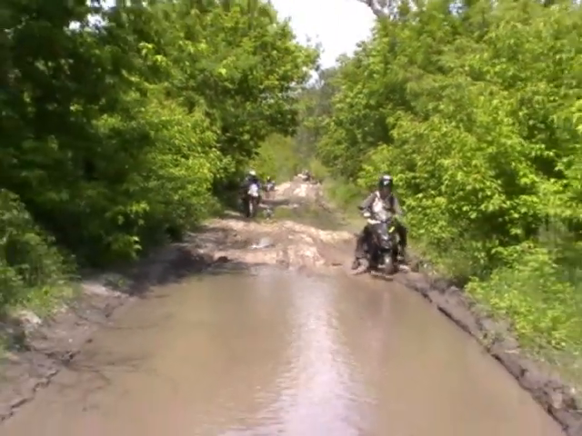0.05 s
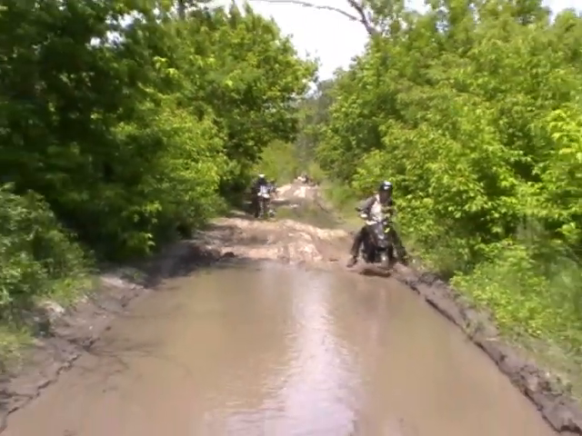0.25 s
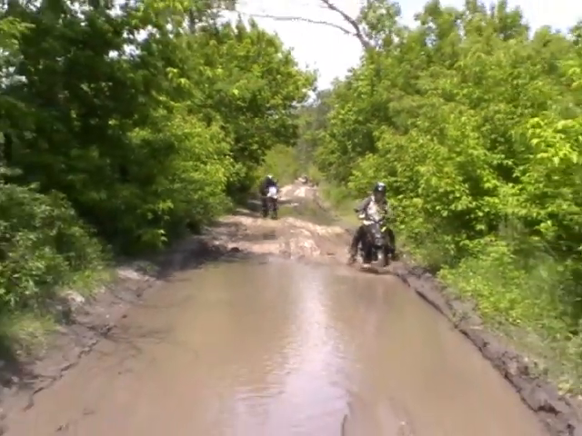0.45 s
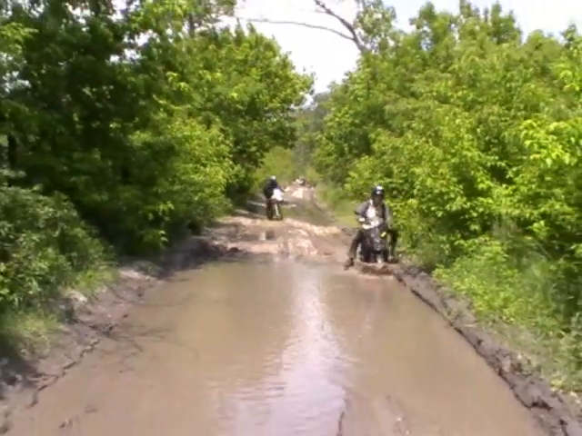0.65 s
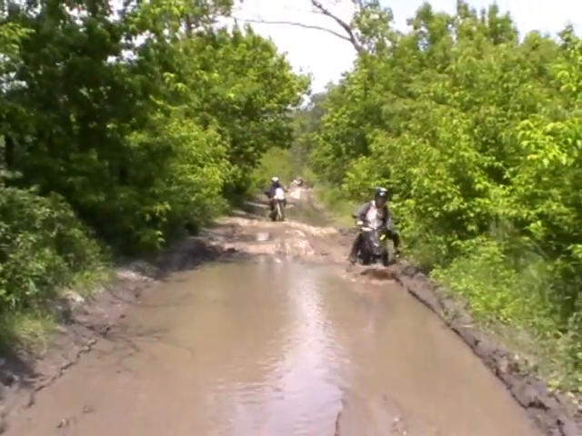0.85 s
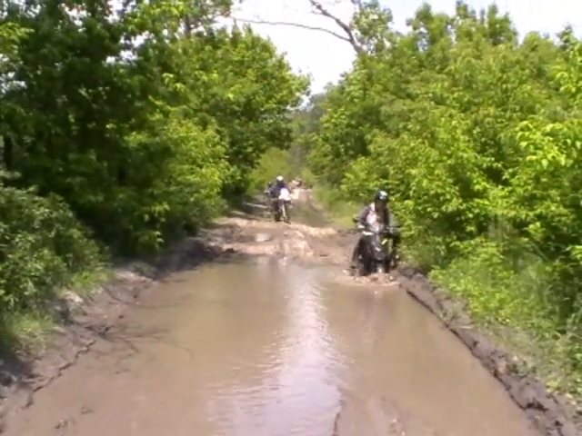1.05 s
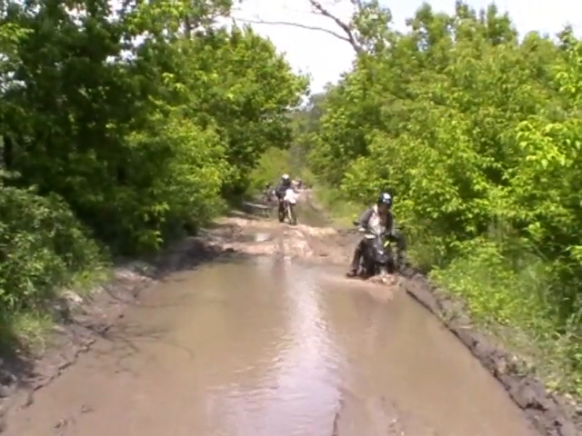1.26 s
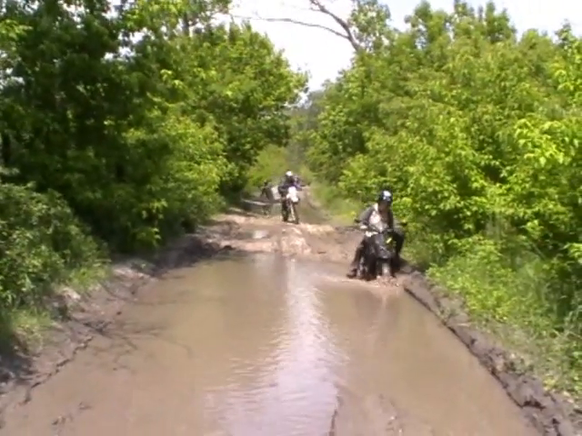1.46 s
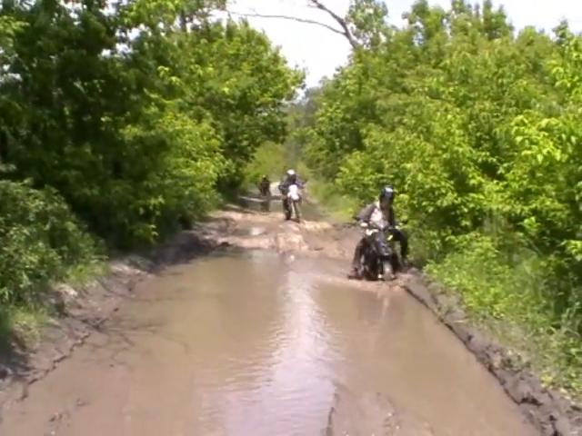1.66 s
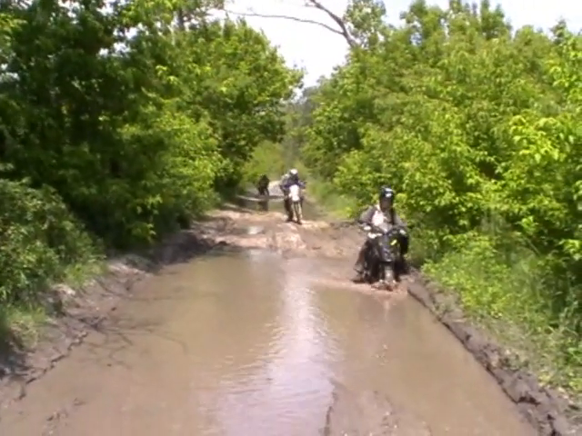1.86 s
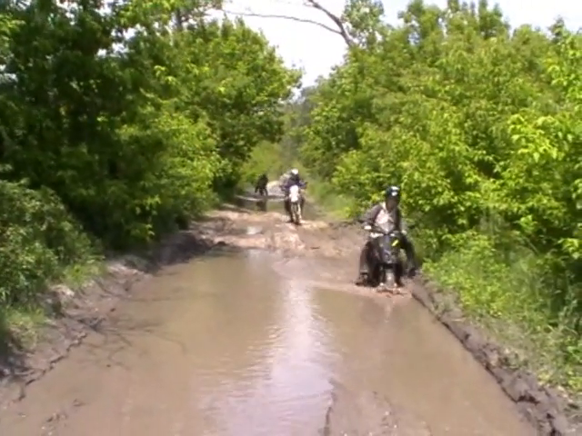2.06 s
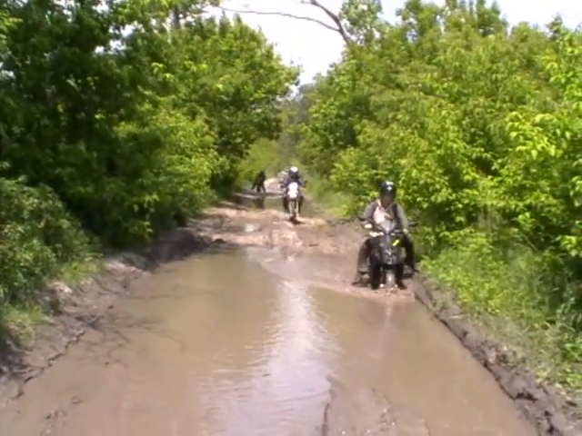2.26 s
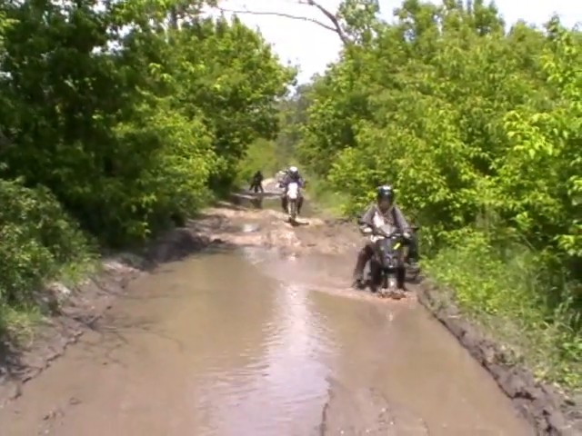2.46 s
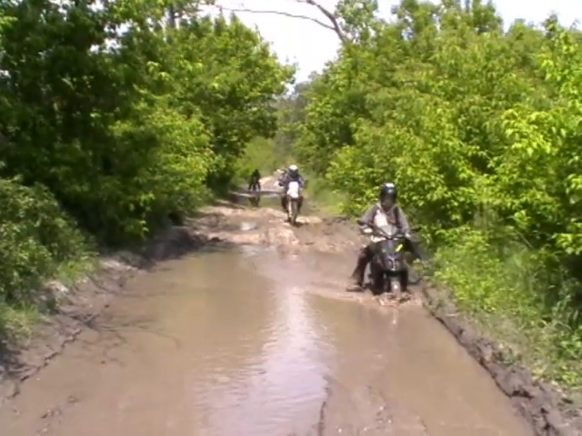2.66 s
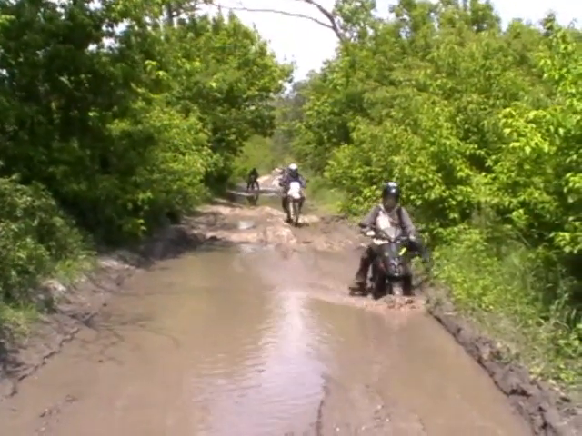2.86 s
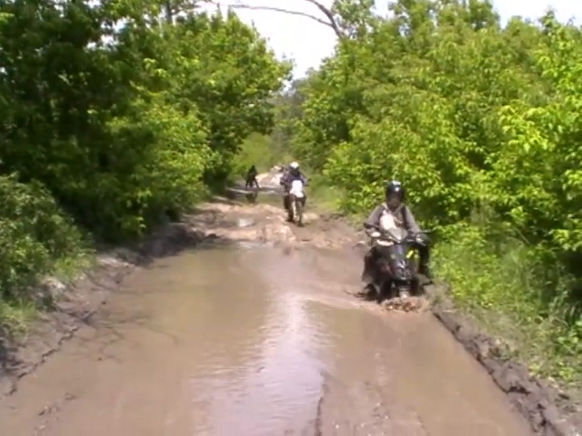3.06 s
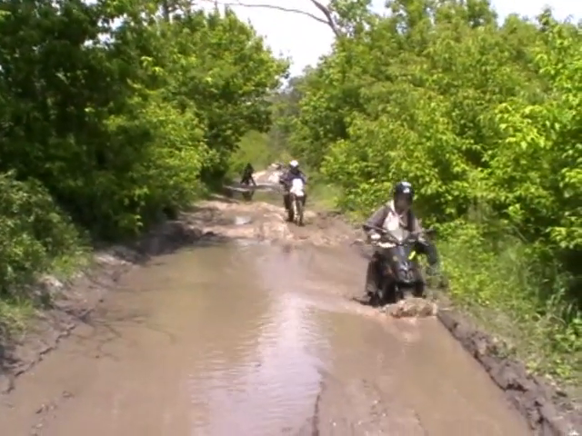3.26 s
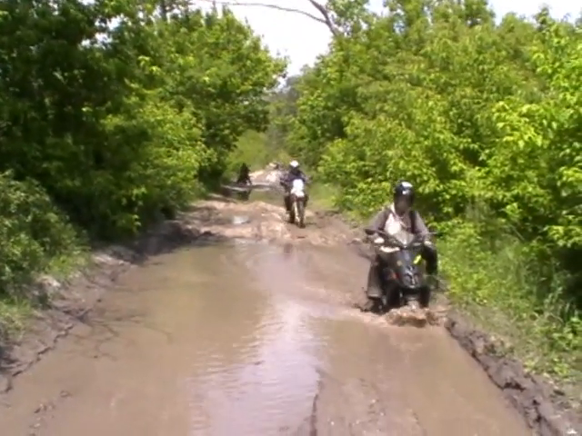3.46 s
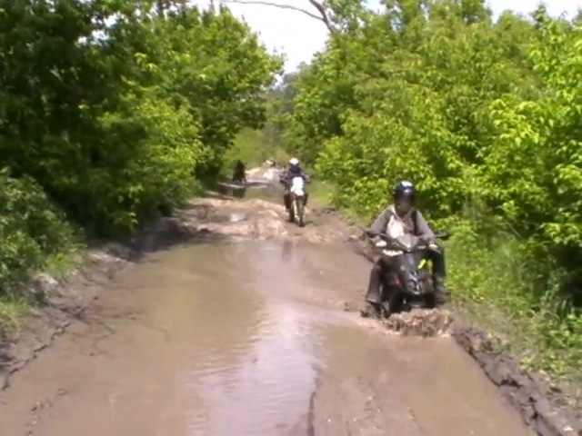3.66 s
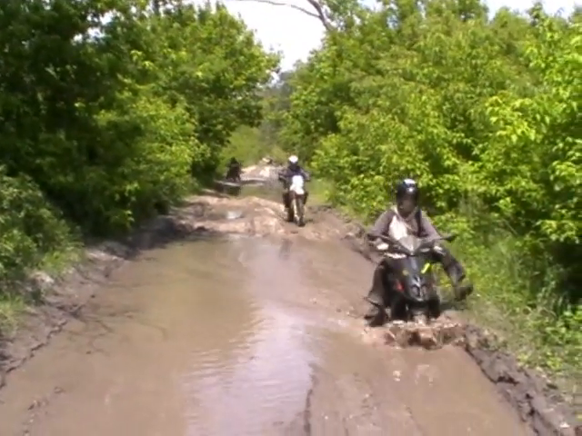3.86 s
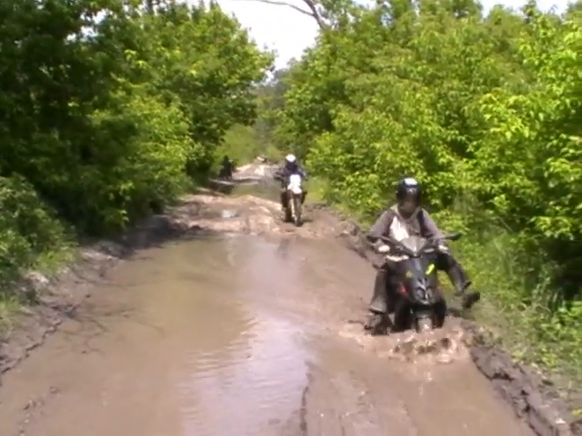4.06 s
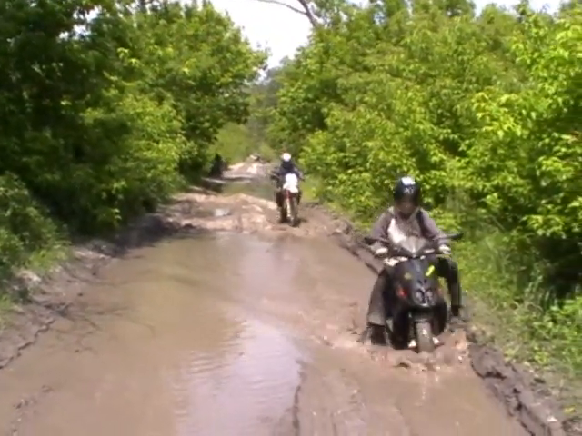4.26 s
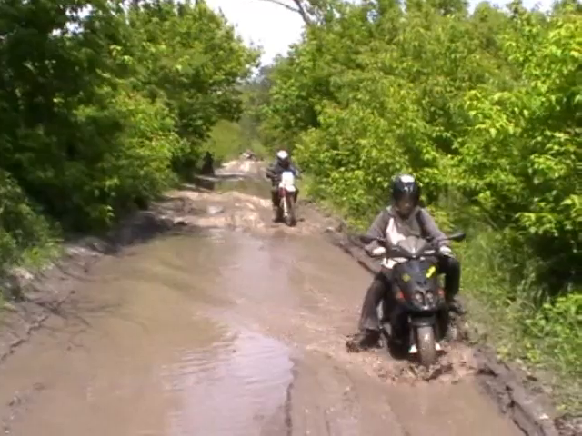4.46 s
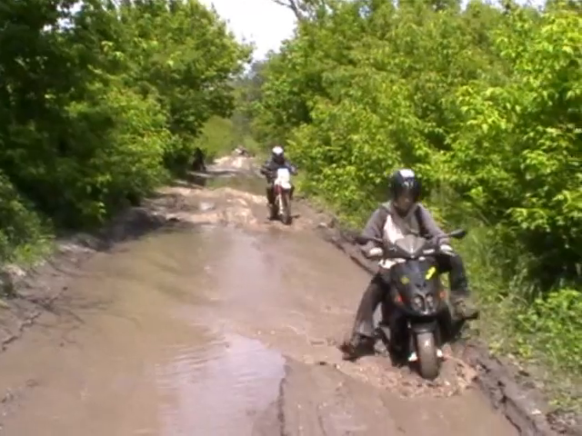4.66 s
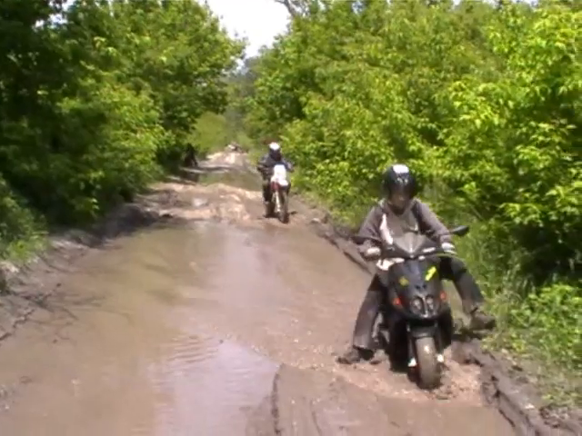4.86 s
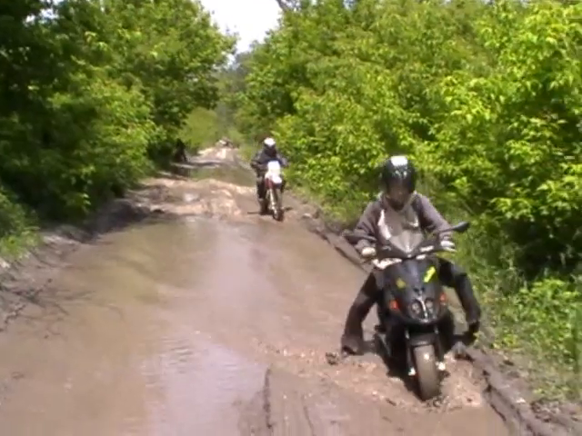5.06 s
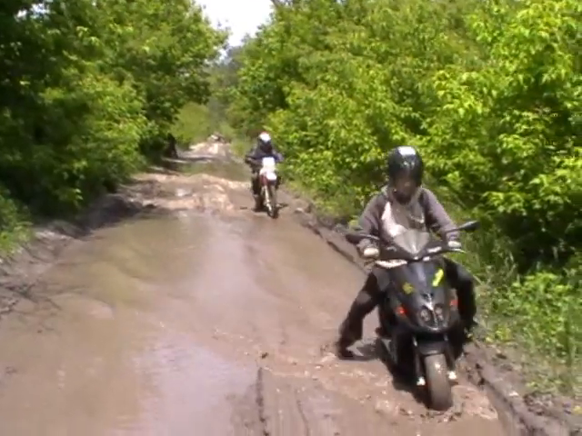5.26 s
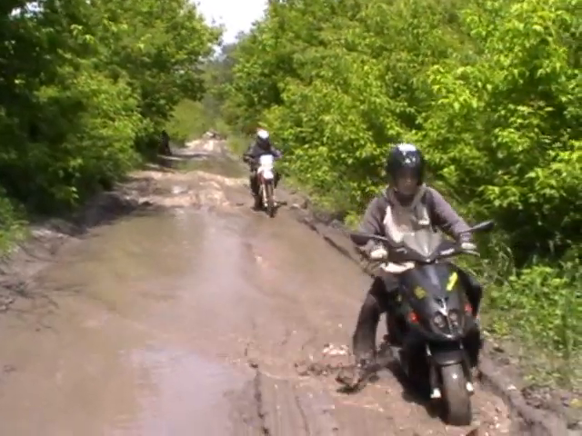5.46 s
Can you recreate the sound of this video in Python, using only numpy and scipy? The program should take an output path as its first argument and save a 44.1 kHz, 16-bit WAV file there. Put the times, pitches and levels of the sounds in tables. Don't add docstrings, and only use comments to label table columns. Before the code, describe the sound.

Buzzing scooter engine starts faint, climbs and wavers in pitch while approaching through shallow water, with wheel spray and sharp droplet slaps outdoors.

```python
import sys
import numpy as np
from scipy import signal
from scipy.fft import rfft, irfft
from scipy.io import wavfile
from scipy.ndimage import uniform_filter1d

SR = 44100
rng = np.random.default_rng(int(sys.argv[2]) if len(sys.argv) > 2 else 0)


def store_wav(level_fs):
    pcm = np.round(np.clip(np.atleast_2d(level_fs), -1, 1) * 32767)
    wavfile.write(sys.argv[1], SR, pcm.T.astype(np.int16))


def boost(x):
    u = np.asarray(x, float) / 20
    return 10 ** u


N = 243014
T = np.arange(N) / SR
HZ = np.fft.rfftfreq(N, 1 / SR)


def at(table, hz):
    f, v = np.transpose(table)
    return np.interp(np.log(hz + 1), np.log(f), v)


def unit(x):
    return x / np.sqrt(np.mean(x ** 2))


def colour(x, table):
    return unit(irfft(rfft(x) * boost(at(table, HZ)), N))


def noise():
    return rng.standard_normal(N)


def walk(rate):
    hold = int(SR / rate)
    steps = np.repeat(rng.standard_normal(N // hold + 1), hold)
    return 1.24 * uniform_filter1d(uniform_filter1d(steps, hold), hold)[:N]


def tent(s, half):
    return np.clip(1 - abs(T - s) / half, 0, 1)


def close():
    from_s, by_s = 4.68, 5.36
    return np.clip((T - from_s) / (by_s - from_s), 0, 1)


def throttle():
    # time in seconds, firing rate in Hz, exhaust note in dB, water pressing on the tailpipe in dB,
    # engine load in dB.
    engine = [(0.0, 56.06, -44, 0, -42), (0.38, 59.4, -38.5, -2, -43), (0.62, 68.92, -34, 1, -41),
              (1.27, 70.18, -32, 2, -39.5), (1.56, 79.37, -28, -6.5, -37.5),
              (1.82, 82.96, -28.5, -5.5, -38), (2.49, 85.05, -30, -1, -37.5), (2.99, 80.52, -28, 2, -37),
              (3.38, 81.55, -25.5, 3, -36.5), (3.51, 85.77, -29, 0, -35), (3.8, 79.87, -25, 4, -36.5),
              (4.02, 69.2, -24.5, 1, -34), (4.23, 67.36, -25, -0.5, -33), (4.42, 73.6, -24, -3.5, -32),
              (4.52, 73.5, -23.5, 0, -33), (4.64, 65.33, -24, 0, -34.5), (5.14, 81, -22.5, -2.5, -33),
              (5.51, 86.23, -23, -2.5, -31.5)]
    s, *columns = np.transpose(engine)
    return [uniform_filter1d(np.interp(T, s, column), SR // 40) for column in columns]


def low_orders(hz, note_db, pressed_db):
    # frequency in Hz, level in dB.
    passed = [(115, -13), (165, 0), (205, -0.5), (235, -6), (280, -5), (348, -10), (368, -3), (400, -14.5)]
    order_db = [0.3, -0.2, -0.3, -5]
    nearing = [0.16, -0.22, 0.44, -1.75]
    pressed = [0.019, 1.43, -0.45, 0.38]
    flutter_db = [0.4, 1.1, 1.5, 2.5]
    # time in seconds, half length in seconds,
    # loss of order 2 in dB, loss of orders 4 and 5 in dB.
    gulps = [
        (0.33, .06, 2.5, 3),
        (1.33, .04, -4, 3.5),
        (2.004, 0.1, 0.3, 12),
        (2.754, 0.1, 0.5, 11),
        (3.426, 0.054, 2.5, 11),
        (3.55, .06, -0.5, 5.5),
        (4.579, 0.086, 8.5, 14),
    ]
    deep_db = sum(deep * tent(s, half) for s, half, deep, _ in gulps)
    high_db = sum(high * tent(s, half) for s, half, _, high in gulps)
    gulp_db = [-deep_db, 0.45 * deep_db, 4 * close() - high_db, -high_db]
    levels = []
    for i in range(4):
        level = note_db + order_db[i] + nearing[i] * (T - T.mean())
        level = level + at(passed, (i + 2) * hz) + pressed[i] * pressed_db
        levels.append(level + flutter_db[i] * walk(14) + gulp_db[i])
    return levels


def exhaust(hz, turn, low_db, roar_db, upper_db, pressed_db):
    # frequency in Hz, phase in radians.
    silencer = [(170, 0), (249, -.25), (256, -1.4), (272, -2.9), (290, -2.4), (310, -1.3), (335, -.7),
                (350, -1.6), (412, .75)]
    # frequency in Hz, level in dB.
    pipe = [(420, -21), (520, -9), (650, -8), (850, -7.5), (1100, -8.5), (1400, -10.5), (1800, -10.5),
            (2400, -45)]
    # frequency in Hz, width in Hz, level over the roar in dB,
    # extra level at close range in dB.
    resonances = [(498, 30, -17, -0.5), (586, 25, -16, -32), (642, 41, -10.5, -2), (854, 33, -13.5, 10),
                  (1070, 69, -23, 17.5), (1365, 15, -28, 23), (1500, 30, -34, 16), (1662, 26, -34, 33),
                  (1884, 22, -34, 23)]
    note = 0
    for k, db in enumerate(low_db, start=2):
        note = note + boost(db) * np.cos(k * turn + at(silencer, k * hz))
    note = note + boost(1.44 * roar_db - 6.5 + 2.5 * walk(8.3)) * np.cos(turn)
    near = close()
    odd_db = -0.3 + 0.63 * pressed_db
    for k in range(6, 24):
        gain = boost(upper_db + at(pipe, k * hz) - 13.5)
        for peak_hz, width, db, close_db in resonances:
            if abs(k * hz.mean() - peak_hz) < peak_hz / 4:
                peak = np.exp(-((k * hz - peak_hz) / width) ** 2)
                gain = gain + boost(db + close_db * near + 0.16 * upper_db) * peak
        drift = 2 * np.pi * rng.random() + 0.7 * walk(20)
        gain = gain * boost(k % 2 * odd_db + 2.3 * walk(6))
        note = note + boost(roar_db + 2.2 * walk(35)) * gain * np.cos(k * turn + drift)
    return np.sqrt(2) * note


def gas(turn, roar_db, rasp_db, shake_db):
    # frequency in Hz, density in dB per Hz.
    roar_tone = [(60, -60), (180, -3), (300, -1.5), (430, -4.5), (650, 0), (900, 0.5), (1300, -9),
                 (1800, -12), (2600, -3), (4500, -76)]
    # frequency in Hz, density in dB per Hz.
    rasp_tone = [(300, -70), (800, -38), (1200, 1.5), (1600, -2.5), (2000, -2.5), (2330, 2), (2600, -10),
                 (2950, 2.5), (3250, 1), (3500, -6.5), (4000, -16.5), (4300, -28), (5000, -44), (8000, -80)]
    puff = np.cos(turn - 1.5)
    roar = colour(noise() * (1 + 0.25 * puff) * boost(1.1 * walk(60)), roar_tone)
    rasp = colour(noise() * (1 + 0.1 * puff) * boost(1.1 * walk(120) + shake_db), rasp_tone)
    return boost(roar_db - 2.0) * roar + boost(rasp_db + 0.25) * rasp


def surges():
    # crest in seconds, level over the spray in dB, half length in seconds.
    sheets = [(0.043, 4, 0.029), (0.52, 4, 0.026), (0.714, 4, 0.32), (1.165, 4.5, 0.32), (1.798, 3, 0.14),
              (2.15, 4, 0.019), (2.824, 2.5, 0.083), (3.483, 3, 0.095), (3.71, 4, 0.088), (4.11, 4.5, 0.17),
              (4.544, 1.5, 0.064), (4.735, 1, .09), (4.879, -3, 0.034), (4.998, 4, 0.019), (5.448, 1, 0.26)]
    return sum(db * tent(s, half) for s, db, half in sheets)


def spray(db, mist_db):
    # frequency in Hz, density in dB per Hz.
    water_tone = [(3000, -60), (3900, -22), (4350, 1.5), (4800, 7), (6900, 6), (9500, 4), (10600, 4),
                  (12500, -6), (14000, -28), (16000, -40)]
    # frequency in Hz, density in dB per Hz.
    mist_tone = [(6000, -50), (9000, 0), (10500, -13.5), (12000, 0), (13000, -1), (13650, 1), (14050, -7),
                 (15700, -5)]
    size_db = 3.5 * np.minimum(rng.standard_exponential(N), 4.2)
    ticks = (rng.random(N) < 350 / SR) * boost(size_db)
    swell = signal.lfilter([1], [1, -0.985], ticks)
    water = colour(noise() * (1 + 0.13 * swell) * boost(0.59 * walk(30.18)), water_tone)
    mist = colour(noise() * (1 + 0.22 * swell) * boost(1.3 * walk(22)), mist_tone)
    return boost(db + 1.13) * (water + boost(mist_db - 0.6) * mist)


def drops():
    # time in seconds, peak level in dB, centre frequency in Hz.
    slaps = [(0.0438, -27, 5840), (0.5162, -34, 5720), (0.5505, -47, 9600), (0.6733, -34, 9890),
             (0.962, -44, 5970), (1.115, -37, 9900), (1.2298, -43, 9186), (1.483, -30, 9230),
             (2.0892, -39, 5673), (2.14, -23, 13400), (2.6806, -35, 7030), (3.4371, -30, 9784),
             (3.4546, -34, 7627), (3.9434, -29, 6060), (4.0829, -25, 11530), (4.2798, -30, 6103),
             (4.5561, -37, 5750), (4.6858, -25.5, 8500), (4.8279, -32, 13420), (4.9744, -28, 13250),
             (5.2984, -43, 9020)]
    length = 600
    out, t = np.zeros(N + length), np.arange(length) / SR
    decay = np.exp(-t / 0.0011) + 0.18 * np.exp(-t / 0.006)
    for s, db, hz in slaps:
        band = signal.butter(1, [hz * 0.6, min(hz * 1.5, 19000)], "band", fs=SR)
        grit = signal.lfilter(*band, rng.standard_normal(length))
        start = int(s * SR)
        out[start:start + length] += boost(db - 8.5) * grit * decay
    return out[:N]


def rattle(turn):
    panel = [(3500, -77), (4500, -47), (4930, -4), (5040, -6), (5150, -6), (5600, -57), (7000, -87)]  # Hz, dB
    buzz = colour(noise() * (1 + 0.54 * np.cos(turn)), panel)
    since = T - 4.76
    level_db = -64.5 + 10 * since + 2.47 * walk(9)
    return boost(level_db) * np.clip(since / 0.13, 0, 1) * buzz


def whine():
    start_hz, hz_per_s, end_s = 1787, 140, 0.6
    fade = np.clip((end_s - T) / 0.056, 0, 1)
    tone = np.sin(2 * np.pi * (start_hz + hz_per_s * T / 2) * T)
    return np.sqrt(2) * boost(-56 + 1.7 * walk(9.5)) * fade * tone


def background(note_db):
    # frequency in Hz, density in dB per Hz.
    rumble_tone = [(25, -36), (45, -21), (65, -20), (90, -9.5), (180, 1.5), (300, -2), (420, -9),
                   (600, -31), (1500, -80)]
    # frequency in Hz, density in dB per Hz.
    far_tone = [(60, -60), (150, -15), (330, -11), (490, 5.5), (620, 5.5), (800, 2.5), (1200, -39),
                (2500, -8), (4500, -70)]
    rumble = boost(note_db - 15.0) * colour(noise(), rumble_tone)
    far_roar = boost(-44.5 + 1.5 * walk(3.13)) * colour(noise(), far_tone)
    far_hz = 501.5 * (1 + 0.012 * walk(4) + 0.008 * walk(30))
    far_turn = 2 * np.pi * np.cumsum(far_hz) / SR
    fade = np.clip(2.6 - T, 0, 1)
    far_note = boost(-50 + 2.9 * walk(16)) * fade * np.sqrt(2) * np.sin(far_turn)
    return rumble + far_note + far_roar


def ports(x, other):
    # frequency in Hz, likeness from 0 to 1.
    likeness = [(30, .6), (60, 0.8), (130, 0.66), (290, 0.9), (640, 1), (1400, 0.98), (3100, 0.99),
                (4300, 0.41), (5500, 0.6), (8000, 0.62), (12000, 0.95), (15000, 0.5)]
    # frequency in Hz, level in dB.
    left_over_right = [(60, 1), (110, -1), (200, 0), (380, 0), (700, 2.5), (1290, 0), (2380, 3.5),
                       (4400, 1.5), (8120, 1), (15000, 2.5)]
    # frequency in Hz, phase in radians.
    left_leads = [(60, 0.19), (150, 0.39), (300, 0.18), (600, 0.46), (1400, -0.054), (1640, 0.81),
                  (2150, -0.0016), (3000, 0.05), (5000, -0.66), (10000, 0)]
    like = np.clip(at(likeness, HZ), 0, 1)
    tilt = boost(at(left_over_right, HZ) / 2) * np.exp(0.5j * at(left_leads, HZ))
    mid = rfft(x) * np.sqrt((1 + like) / 2)
    side = rfft(other) * np.sqrt((1 - like) / 2)
    return np.array([irfft((mid + side) * tilt, N), irfft((mid - side) / tilt, N)])


def scene():
    hz, note_db, pressed_db, load_db = throttle()
    turn = 2 * np.pi * np.cumsum(hz * (1 + 0.00407 * walk(40))) / SR
    low_db = low_orders(hz, note_db, pressed_db)
    upper_db = -3.5 + 0.6945 * (hz - hz.mean()) - 0.98 * pressed_db
    rumble_db = 0.74 * uniform_filter1d(np.max(low_db, axis=0), SR // 4) - 6.5
    load, surge_db = load_db - load_db.mean(), surges()
    shake_db = 0.55 * walk(40)
    rasp_db = -42.5 + 0.61 * load + 0.93 * T + 0.63 * surge_db
    spray_db = -60 + 0.35 * load + 1.5 * T + surge_db + 1.1 * shake_db
    mist_db = -3.5 + 0.67 * T + 0.19 * surge_db

    def noises():
        return gas(turn, load_db, rasp_db, shake_db) + spray(spray_db, mist_db) + background(rumble_db)

    direct, scattered = noises(), noises()
    scooter = exhaust(hz, turn, low_db, load_db, upper_db, pressed_db) + rattle(turn) + whine()
    return ports(scooter + drops() + direct, scattered)


def low_pass(x):
    return signal.sosfilt(signal.butter(12, 15960, fs=SR, output="sos"), x)


def record(dry):
    mix = irfft(rfft(dry) * (HZ < 15760), N)
    return low_pass(mix)


dry = scene()
out = record(dry)
store_wav(out)
```